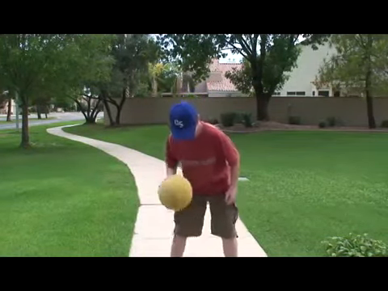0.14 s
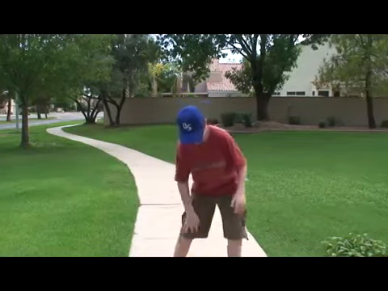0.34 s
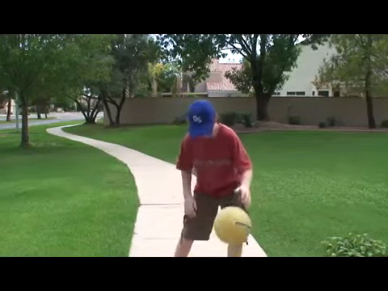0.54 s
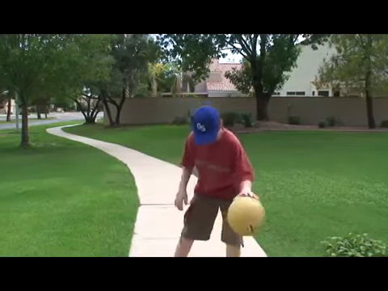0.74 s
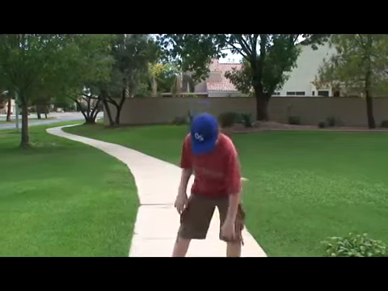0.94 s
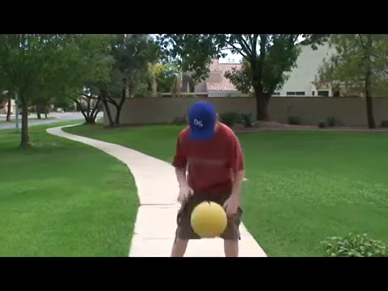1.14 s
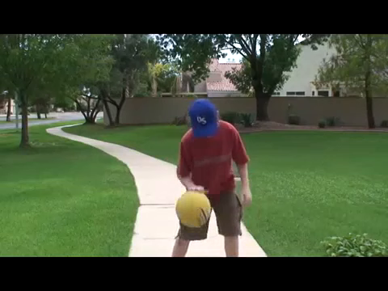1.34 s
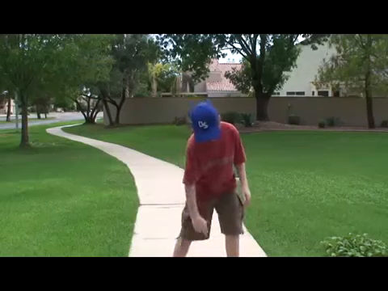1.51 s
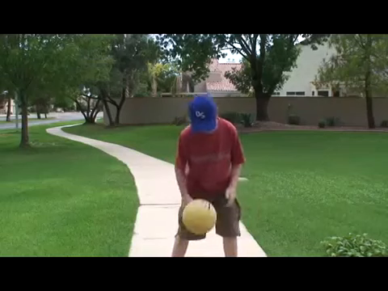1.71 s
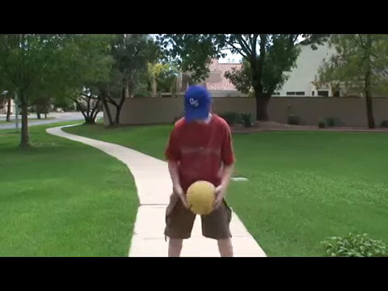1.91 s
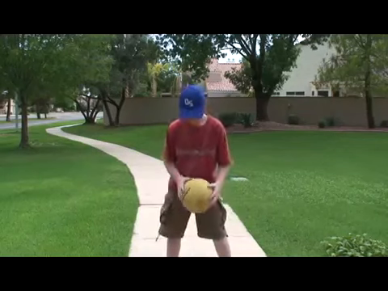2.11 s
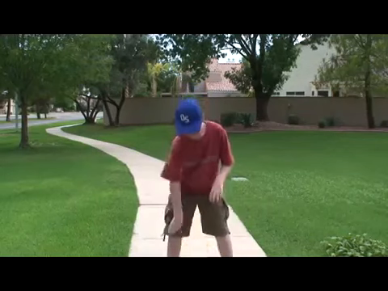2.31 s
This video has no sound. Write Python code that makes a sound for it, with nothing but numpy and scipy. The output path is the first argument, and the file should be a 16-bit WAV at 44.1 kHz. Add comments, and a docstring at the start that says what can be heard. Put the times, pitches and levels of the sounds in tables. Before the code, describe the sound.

A rubber ball is bounced four times on a concrete path in a quiet park

```python
"""A rubber ball is dribbled four times on a concrete park path. Each bounce slaps on touching down, squashes flat
and slaps again on lifting off some 15 ms later: filtered clicks, scraped grit noise and a low thump.
The rubber wall buckles, pops out and rings briefly, and the air inside pings, all as damped sine modes.
Behind it are a low hum of sine tones, distant traffic and leaves and a faint hiss of filtered noise, and birds of
gliding sines. Before the last bounce the level dips, and all is then duller and mono."""
import sys
import numpy as np
from scipy import signal
from scipy.fft import rfft, irfft, next_fast_len
from scipy.io import wavfile
from scipy.ndimage import uniform_filter1d

SR = 44100
rng = np.random.default_rng(int(sys.argv[2]) if len(sys.argv) > 2 else 0)


def store_wav(level_fs):
    """Save 16-bit WAV to argv[1]."""
    pcm = np.round(np.clip(np.atleast_2d(level_fs), -1, 1) * 32767)
    wavfile.write(sys.argv[1], SR, pcm.T.astype(np.int16))


N = 108265


def undb(db):
    """Decibels to gain."""
    return 10 ** (np.asarray(db) / 20)


def unit(x):
    """Scale to rms 1."""
    return x / np.sqrt(np.mean(x ** 2))


def response(points):
    """Causal minimum-phase impulse response with the given (frequency_hz, gain_db) colour."""
    hz, db = np.array(points).T
    size = next_fast_len(N) // 2 * 2
    bins_hz = np.fft.rfftfreq(size, 1 / SR)
    gain_db = np.interp(np.log(bins_hz + 1), np.log(hz), db)
    # Folding the cepstrum onto positive time makes the response causal.
    cepstrum = irfft(np.log(undb(gain_db)))
    cepstrum[1:size // 2] *= 2
    cepstrum[size // 2 + 1:] = 0
    return irfft(np.exp(rfft(cepstrum)))[:4096]


def convolve(x, h):
    """Pass a sound through an impulse response."""
    return signal.fftconvolve(x, h)[:N]


def noise(points):
    """Coloured noise of rms 1."""
    return unit(convolve(rng.standard_normal(N), response(points)))


def band(x, hz, kind, order=2):
    """Low-pass or high-pass Butterworth filter."""
    sos = signal.butter(order, min(hz, SR / 2 - 1), kind, fs=SR, output="sos")
    return signal.sosfilt(sos, x)


def walk(rate_hz):
    """Slow random drift with rms 1, from smoothed random steps."""
    k = int(SR / rate_hz)
    steps = np.repeat(rng.standard_normal(N // k + 1), k)
    return unit(uniform_filter1d(uniform_filter1d(steps, k), k)[:N])


def fade(t, t60_s):
    """Exponential decay from t = 0, silence before."""
    return (t >= 0) * np.exp(-np.log(1000) * np.maximum(t, 0) / t60_s)


def swell(t, rise_s):
    """Soft onset from t = 0."""
    return 1 - np.exp(-np.maximum(t, 0) / rise_s)


def ring(t, modes, pitch_ratio=1):
    """Damped sine modes (pitch_hz, gain_db, t60_s) struck at t = 0."""
    out = 0
    for hz, db, t60_s in modes:
        out = out + undb(db) * fade(t, t60_s) * np.sin(2 * np.pi * hz * pitch_ratio * t)
    return out


def stereo(mid, side):
    """Left and right from middle and side."""
    return np.array([mid + side, mid - side])


def scatter(x, t60_s):
    """Diffuse outdoor echo, about as strong as its source: a decaying noise tail."""
    # Colour of the scatter from lawn, trees and garden wall: frequency_hz, gain_db
    yard_colour = [(60, -2), (200, 3.5), (900, -4.5), (3000, -3.5), (7000, 0), (13000, -5.5)]
    tail = noise(yard_colour) * fade(np.arange(N) / SR, t60_s)
    return convolve(x, tail / np.sqrt(np.sum(tail ** 2)))


def around(x, t60_s):
    """Diffuse echo that differs between left and right."""
    return np.array([scatter(x, t60_s), scatter(x, t60_s)])


def ball(t):
    """Each bounce slaps and scrapes at both ends of the contact, squashes, buckles, pops out and rings."""
    # Bounces: start_s, contact_s, touch_db, lift_db, touch_top_hz, lift_top_hz, thump_db,
    # wobble_hz, wobble_db, wall_db, wall_pitch_ratio, buckle_delay_s, buckle_hz, buckle_db,
    # unbuckle_hz, unbuckle_db, low_ping_db, high_ping_db
    bounces = [(0.3741, 0.015, 0, 0.5, 12400, 9100, 2.5, 246, -9.5, 5, 0.97, 0.0037, 680, -11.5, 656, -2, 2, -2),
               (0.9655, 0.015, -2.5, 1, 9100, 9000, 0.5, 215, -16.5, 7.5, 0.87, 0.00434, 648, -7, 800, 3.5, -14, -2),
               (1.5507, .0157, -0.5, -1.5, 6460, 6260, -1.5, 224, -0.5, 6, 1.02, 0.00576, 570, -3.5, 924, -3, -2.5, -2),
               (2.3709, 0.015, 0.5, 5, 6500, 4150, 1.5, 214, -4.5, 1, 0.98, 0.0041, 830, -4.5, 900, -3, -1, -7.5)]
    # Colour of the grit scraped under the ball: frequency_hz, gain_db
    grit_colour = [(100, -38.5), (500, -1.5), (1300, -2), (2100, -6.5), (2900, -9.5), (4500, -10),
                   (6500, -13.5), (9000, -21.5), (13000, -26)]
    clicks, squashes, rings, scrapes = np.zeros((4, N))
    grit = noise(grit_colour)
    for (start_s, contact_s, touch_db, lift_db, touch_hz, lift_hz, thump_db, wobble_hz, wobble_db,
         wall_db, pitch_ratio, buckle_s, buckle_hz, buckle_db, unbuckle_hz, unbuckle_db,
         low_ping_db, high_ping_db) in bounces:
        # Time since touching down and time since lifting off
        down, up = t - start_s, t - start_s - contact_s
        clicks += click(start_s, touch_db, touch_hz)
        clicks += click(start_s + contact_s, lift_db - 4, lift_hz)
        scrapes += scrape(down, up, grit, touch_db, lift_db, touch_hz, lift_hz)
        squashes += squash(down, up, contact_s, thump_db)
        rings += wobble(up, wobble_hz, wobble_db)
        rings += buckle(down - buckle_s, up, buckle_hz, buckle_db, unbuckle_hz, unbuckle_db)
        rings += wall(down, up, wall_db, pitch_ratio)
        rings += inner_air(up, low_ping_db, high_ping_db)
    thump = band(squashes, 262, "low")
    body = band(slap(clicks) + scrapes + thump + rings, 74, "high")
    return in_the_open(body)


def click(at_s, db, top_hz):
    """One impulse, rounded off above top_hz."""
    pulse = np.zeros(N)
    pulse[int(at_s * SR)] = undb(db)
    return band(pulse, top_hz, "low", order=3)


def slap(clicks):
    """Rubber meeting or leaving concrete: clicks coloured by a fixed response."""
    # Colour of the slap: frequency_hz, gain_db
    slap_colour = [(60, 6.5), (300, 2), (800, 8.5), (1500, -0.5), (2200, -1.5), (3000, 7.5), (4500, -3),
                   (6500, -1), (9000, -13.5), (13000, -26)]
    smear = 0.55
    # All-pass: each slap pushes the air, then pulls it.
    push_pull = signal.lfilter([smear, -1], [1, -smear], clicks)
    colour = response(slap_colour)
    return undb(-8) * convolve(push_pull, colour / np.abs(colour).max())


def scrape(down, up, grit, touch_db, lift_db, touch_hz, lift_hz):
    """Grit noise bursts on touching down, then swells into lift-off and dies as the rubber peels away."""
    touch = undb(-19.5 + touch_db) * fade(down, t60_s=0.02) * band(grit, touch_hz, "low")
    rise_s, peel_t60_s = 0.0015, 0.021
    peel_shape = np.where(up < 0, np.exp(-np.abs(up) / rise_s), fade(up, peel_t60_s))
    peel = undb(-26 + lift_db) * peel_shape * band(grit, lift_hz, "low")
    return touch + peel


def squash(down, up, contact_s, thump_db):
    """Flattening pushes out one slow pressure cycle; a low dent mode rings at both ends of the contact."""
    thump_lag_s, dent_lag_s = 0.0024, 0.00087
    dent_hz, dent_t60_s = 123, 0.026
    progress = (down - thump_lag_s) / contact_s
    inside = (progress > 0) * (progress < 1)
    out = undb(-30 + thump_db) * inside * np.cos(2 * np.pi * progress)
    out += ring(down - dent_lag_s, [(dent_hz, -19.5 + thump_db, dent_t60_s)])
    out += ring(up, [(dent_hz, -25.5 + thump_db, dent_t60_s)])
    return out


def wobble(up, hz, db):
    """The whole ball wobbles in one low damped mode that swells from just before lift-off."""
    lead_s, rise_s, t60_s = 0.0036, 0.0043, 0.034
    rising = up + lead_s
    return swell(rising, rise_s) * ring(rising, [(hz, -14.5 + db, t60_s)])


def buckle(since_buckle, up, buckle_hz, buckle_db, unbuckle_hz, unbuckle_db):
    """The wall buckles in as a struck damped mode, then pops out as a short bell-shaped tone burst."""
    buckling = ring(since_buckle, [(buckle_hz, -13.5 + buckle_db, 0.026)])
    pop_lag_s, pop_width_s = 0.00226, 0.0021
    pop = up - pop_lag_s
    pop_shape = np.exp(-(pop / pop_width_s) ** 2)
    popping = undb(-20 + unbuckle_db) * pop_shape * np.cos(2 * np.pi * unbuckle_hz * pop)
    return buckling + popping


def wall(down, up, db, pitch_ratio):
    """The rubber wall rings at touch-down and lift-off; its pitch rises as it springs back into shape."""
    # Rubber wall modes, before the pitch ratio of each bounce: pitch_hz, gain_db, t60_s
    wall_modes = [(515, -14, 0.026), (650, -15, 0.02), (833, -5, 0.017), (976, -8.5, 0.026),
                  (1165, -16.5, 0.041), (1330, -25, 0.019), (1565, -13.5, 0.02)]
    lag_s, rise_s = 0.0011, 0.0024
    sag, recover_s = 0.14, 0.0027  # share by which the pitch starts low, and its recovery time
    free = up - lag_s
    bent_time = free - sag * recover_s * swell(free, recover_s)
    rebound = swell(free, rise_s) * ring(bent_time, wall_modes, pitch_ratio)
    touch = undb(-13) * ring(down, wall_modes, pitch_ratio)
    return undb(-14.5 + db) * (touch + rebound)


def inner_air(up, low_ping_db, high_ping_db):
    """The air inside pings after lift-off in two main modes and a cluster of upper ones."""
    # Upper modes of the air inside: pitch_hz, gain_db, t60_s
    cavity_modes = [(2850, -1, .06), (3030, -4, .13), (3175, -11, .13), (3615, -4, .12), (4188, -10, .16),
                    (4760, -16, .12)]
    # The ball lands on a new spot each time, so the balance of the upper modes varies (spread 3 dB).
    upper = [(hz, db + 3 * rng.standard_normal(), t60_s) for hz, db, t60_s in cavity_modes]
    pings = ring(up, upper)
    pings += undb(low_ping_db) * ring(up, [(1808, 0, 0.21)])
    pings += undb(high_ping_db) * ring(up, [(2426, -3, 0.2)])
    return undb(-46) * swell(up, rise_s=0.0061) * pings


def in_the_open(body):
    """The ball, weaker on the left and slightly widened, with two diffuse outdoor echoes."""
    # Colour of the ball on the left relative to the right: frequency_hz, gain_db
    left_shade = [(60, -1.4), (200, -2), (900, -1.8), (2200, -.6), (5000, -.6)]
    direct = np.array([convolve(body, response(left_shade)), body])
    width = stereo(0, undb(-16.5) * scatter(body, t60_s=0.016))
    long_echo = undb(-23.5) * around(body, t60_s=0.32)
    short_echo = undb(-21) * around(body, t60_s=0.18)
    return direct + width + long_echo + short_echo


def birds(t):
    """Short whistles on curved pitch glides, some clear and some fluttering, echoed by the trees."""
    # Bird chirps: start_s, length_s, start_hz, middle_hz, end_hz, gain_db, flutter (share of pitch)
    chirps = [(0.257, 0.048, 3450, 3550, 3750, -58.5, .045), (0.435, .14, 2560, 2677, 3190, -57, .006),
              (0.572, 0.085, 3400, 3350, 2650, -58.5, .02), (0.753, 0.043, 2480, 2560, 2660, -51.5, .008),
              (1.119, 0.037, 3300, 3550, 3930, -54, .06), (1.184, 0.057, 5230, 5070, 4750, -56, .003),
              (1.188, 0.056, 3200, 3450, 3950, -60, .015), (1.227, 0.041, 5880, 5200, 4430, -57.5, .008),
              (1.28, 0.022, 4000, 3660, 3200, -58, .03), (1.336, 0.062, 3200, 3430, 4050, -59, .05),
              (1.887, 0.04, 3200, 3640, 4200, -55.5, 0.079), (2.139, 0.046, 3500, 3380, 3970, -54.5, .05),
              (2.191, 0.018, 3300, 3430, 3980, -60, .04)]
    song, waver = np.zeros(N), walk(rate_hz=700)
    for start_s, length_s, from_hz, mid_hz, to_hz, db, flutter in chirps:
        progress = np.clip((t - start_s) / length_s, 0, 1)
        glide = np.polyfit([0, 0.5, 1], [from_hz, mid_hz, to_hz], 2)
        hz = np.polyval(glide, progress) * (1 + flutter * waver)
        song += undb(db) * np.sin(np.pi * progress) * np.sin(2 * np.pi * np.cumsum(hz) / SR)
    return undb(-1.5) * song + undb(-3) * around(song, t60_s=0.7)


def swish(t):
    """A faint, narrow hiss rises in pitch and falls again: low-passed noise on a gliding sine."""
    # Moving hiss: time_s, centre_hz, gain_db
    hiss_path = [(0.03, 6290, -83), (.12, 7400, -71), (.22, 8300, -72.5), (.35, 9060, -76.5),
                 (0.502, 8450, -75.5), (.65, 6520, -73), (.72, 6200, -93.5)]
    times, hz, db = np.array(hiss_path).T
    hiss = unit(band(rng.standard_normal(N), 590, "low"))
    carrier = np.sin(2 * np.pi * np.cumsum(np.interp(t, times, hz)) / SR)
    return undb(np.interp(t, times, db)) * hiss * carrier


def hum(t):
    """A distant machine holds a few low sine tones, slightly wavering in pitch and level."""
    # Hum tones: pitch_hz, level_db (rms, before the waver)
    hum_tones = [(193.8, -56.5), (387.6, -66.5), (457.6, -70.5), (527.6, -66.5)]
    drift, waver_db = 0.0027, 0.25  # drift is a share of the pitch
    turns = t + drift * np.cumsum(walk(rate_hz=5.085)) / SR
    out = np.zeros(N)
    for hz, db in hum_tones:
        gain = np.sqrt(2) * undb(db + waver_db * walk(rate_hz=9.26))
        out += gain * np.sin(2 * np.pi * (hz * turns + rng.random()))
    return out


def park(t):
    """Far traffic and leaves as swelling noise; bass central, treble wide, and the treble comes and goes."""
    # Colour of distant traffic and leaves: frequency_hz, density_db (per Hz, relative)
    park_colour = [(25, -17.5), (70, -13.5), (160, -6.5), (240, -11.5), (400, -12), (620, -19.5),
                   (1200, -19), (2400, -24), (4300, -29.5), (6500, -32.5), (9000, -37.5), (11300, -45.5),
                   (13000, -63)]
    # Width of the background: frequency_hz, side_db (relative to the middle)
    park_width = [(60, -27), (200, -22), (370, -9), (670, -3.5), (1200, -4), (4000, -5), (13000, -2)]
    # Treble movement: time_s, gain_db
    treble_moves = [(0, -6), (.15, -6), (.48, 3.5), (.7, -6.5), (.92, -5), (1.1, 2), (1.32, -4), (1.45, -3),
                    (1.68, 3.5), (1.9, -4.5)]
    air = stereo(noise(park_colour), convolve(noise(park_colour), response(park_width)))
    # Smooth split into bass and treble around 4400 Hz
    hz = np.fft.rfftfreq(N, 1 / SR)
    treble = irfft(rfft(air) * hz ** 4 / (hz ** 4 + 4400 ** 4), N)
    flicker_db = 1.3 * walk(rate_hz=31)
    treble_db = np.interp(t, *np.array(treble_moves).T) + flicker_db
    swell_db = 1.16 * walk(rate_hz=3.54)
    return undb(-54 + swell_db) * (air - treble + treble * undb(treble_db))


def scene():
    """The ball in front of the quiet park."""
    t = np.arange(N) / SR
    return ball(t) + birds(t) + swish(t) + hum(t) + park(t)


def record(dry):
    """The level dips briefly; from there on the sound is mono and duller. The very top is cut."""
    # Overall level with its brief dip: time_s, gain_db
    level_dip = [(1.906, 4), (1.911, -17), (1.925, -21.5), (1.936, -0.5), (1.99, 0.5), (2.05, 4)]
    dull_from_s, dull_hz, leak_db = 1.915, 4450, -32
    t = np.arange(N) / SR
    mono = dry.mean(axis=0)
    dull = band(mono, dull_hz, "low", order=6) + undb(leak_db) * mono
    out = np.where(t < dull_from_s, dry, dull) * undb(np.interp(t, *np.array(level_dip).T))
    # Steep cut above 13.2 kHz: 0.2 dB ripple, 70 dB down
    top_cut = signal.ellip(8, 0.2, 70, 13200, fs=SR, output="sos")
    return signal.sosfilt(top_cut, out)


dry = scene()
out = record(dry)
store_wav(out)
```